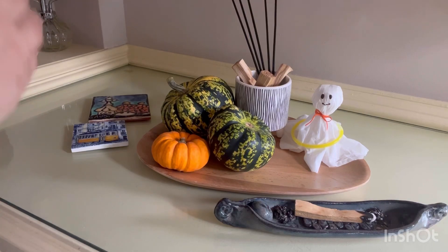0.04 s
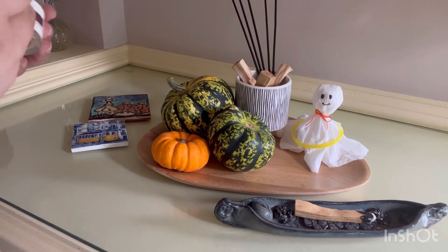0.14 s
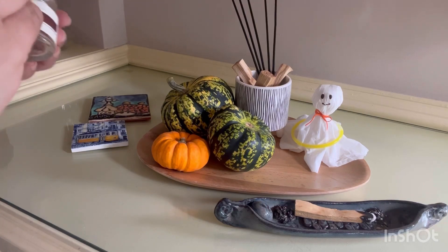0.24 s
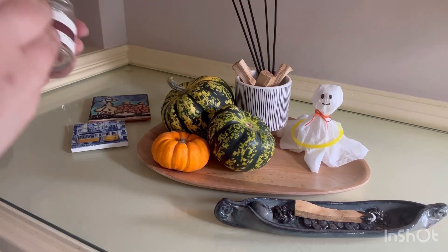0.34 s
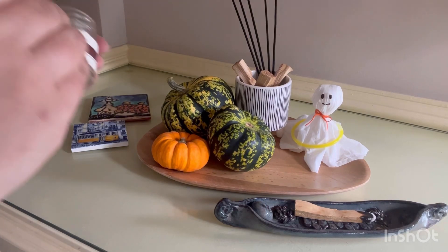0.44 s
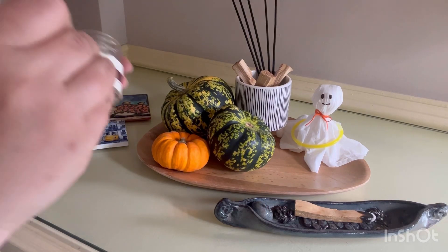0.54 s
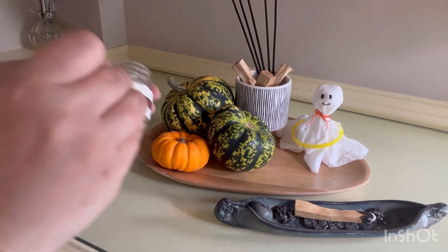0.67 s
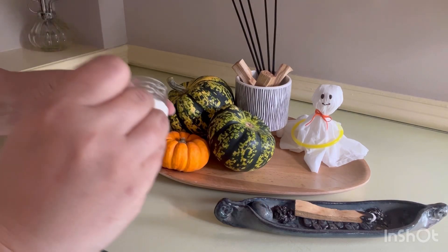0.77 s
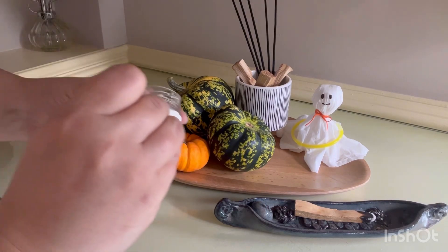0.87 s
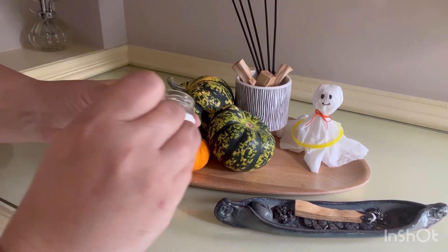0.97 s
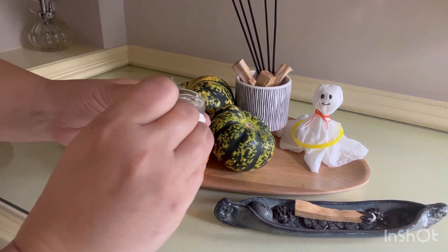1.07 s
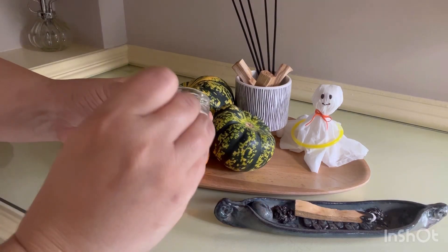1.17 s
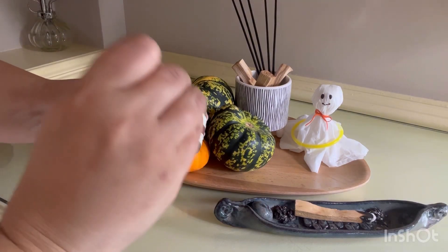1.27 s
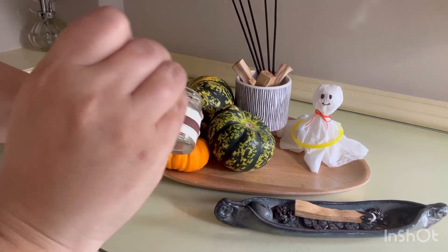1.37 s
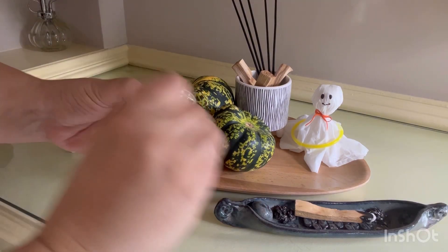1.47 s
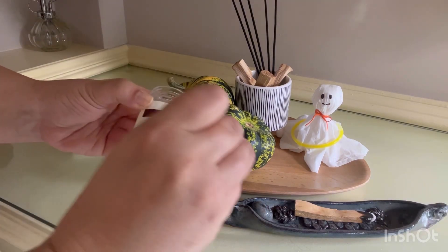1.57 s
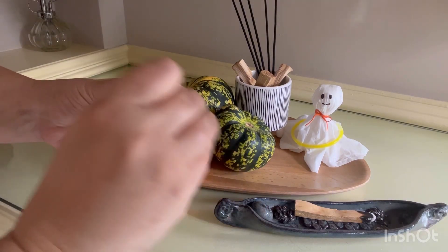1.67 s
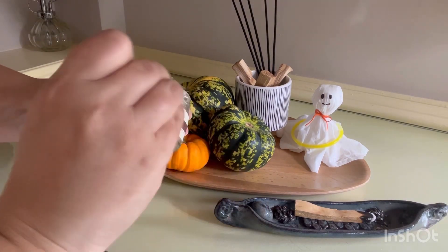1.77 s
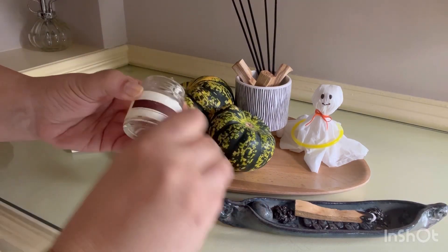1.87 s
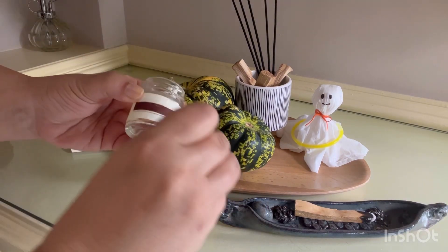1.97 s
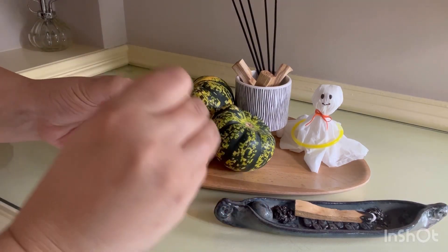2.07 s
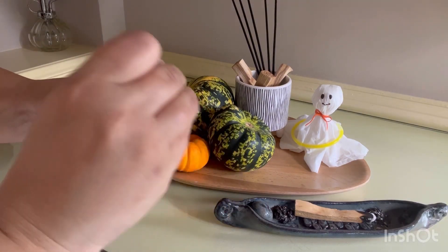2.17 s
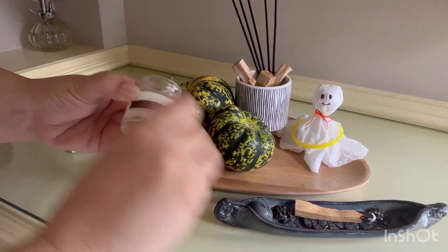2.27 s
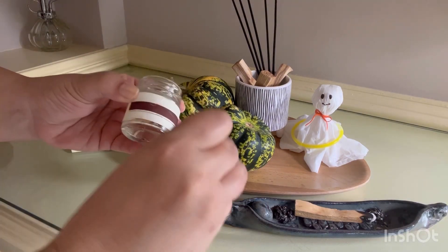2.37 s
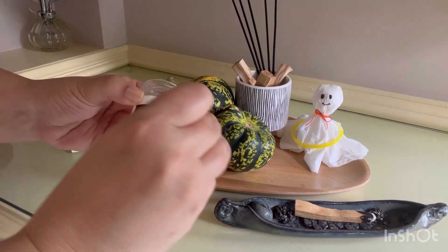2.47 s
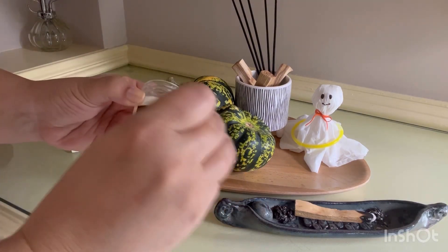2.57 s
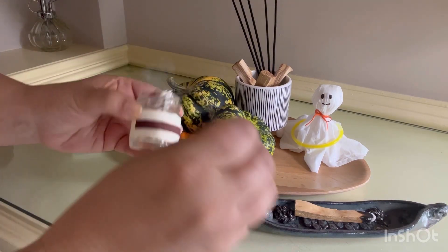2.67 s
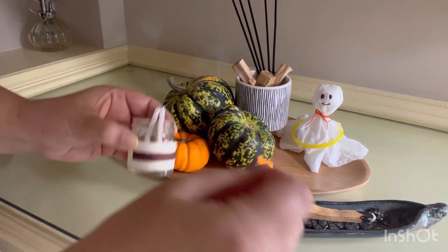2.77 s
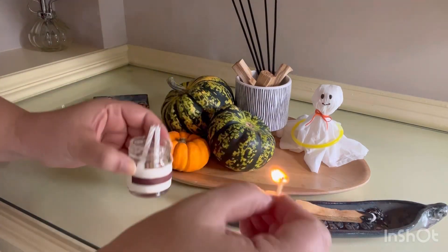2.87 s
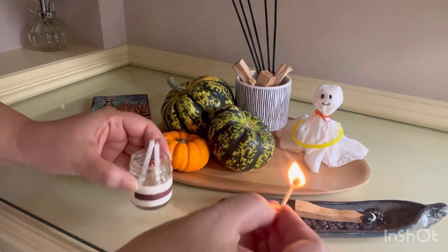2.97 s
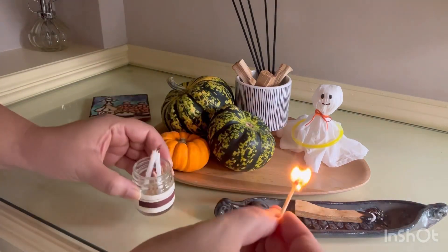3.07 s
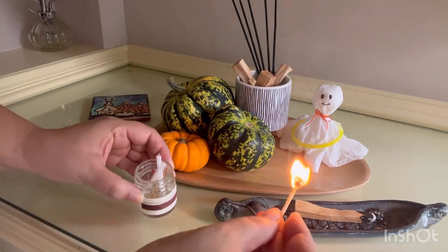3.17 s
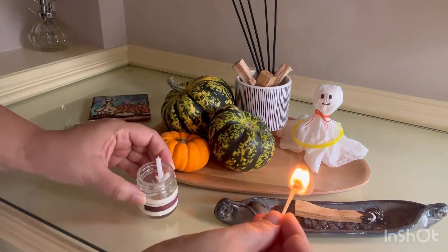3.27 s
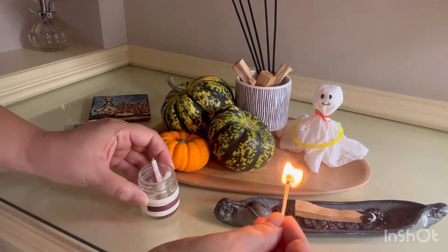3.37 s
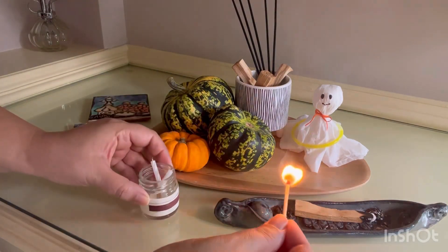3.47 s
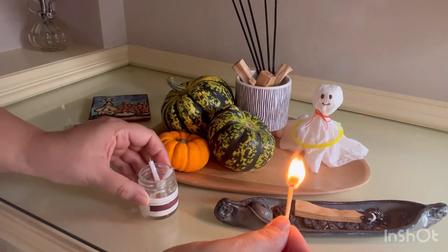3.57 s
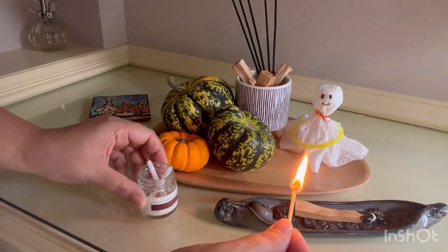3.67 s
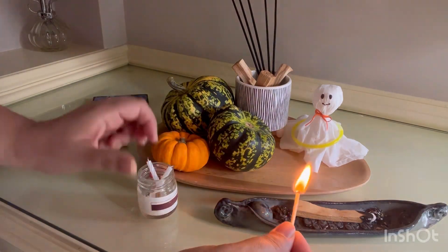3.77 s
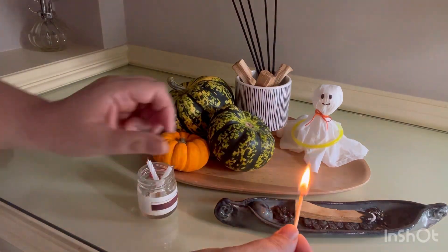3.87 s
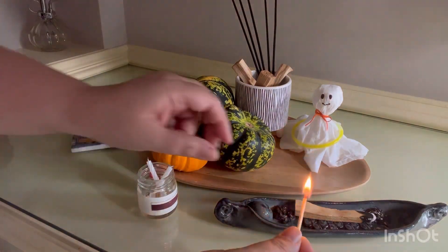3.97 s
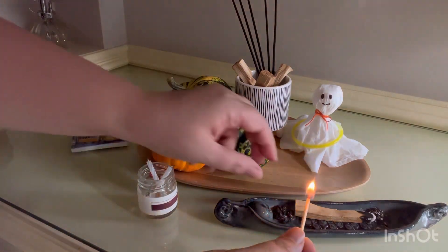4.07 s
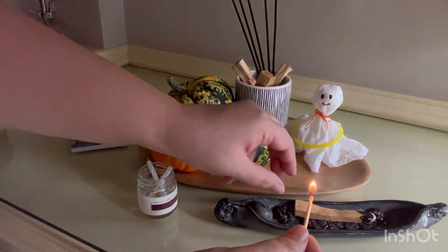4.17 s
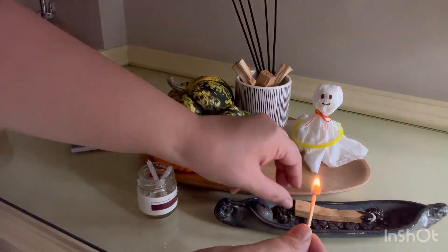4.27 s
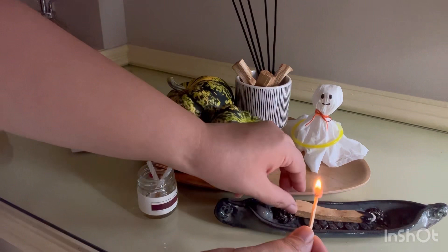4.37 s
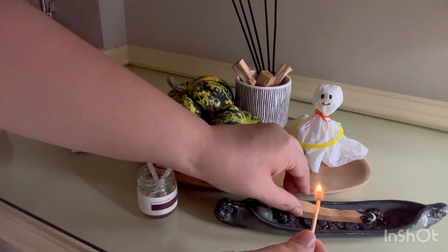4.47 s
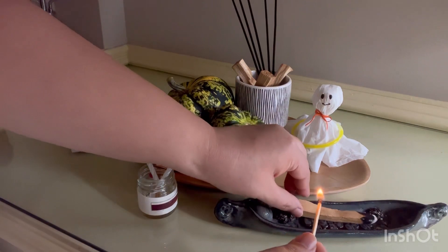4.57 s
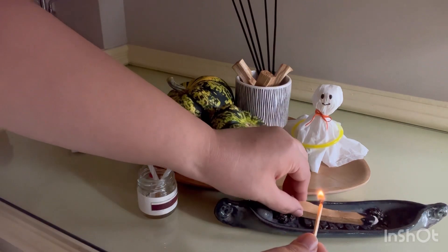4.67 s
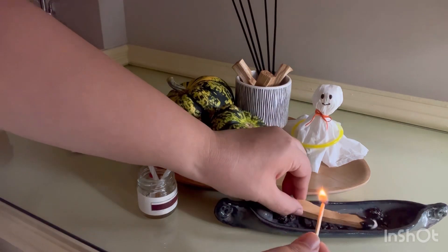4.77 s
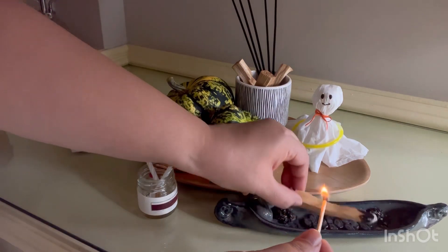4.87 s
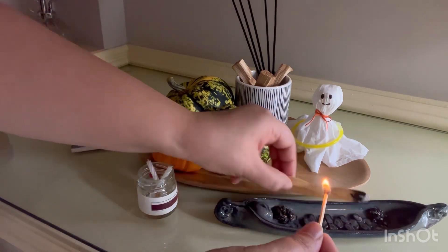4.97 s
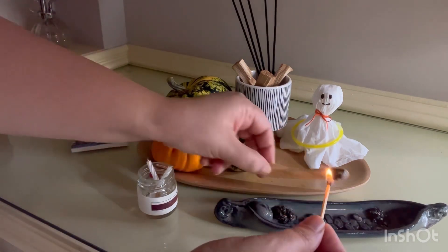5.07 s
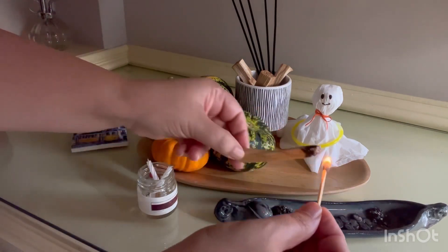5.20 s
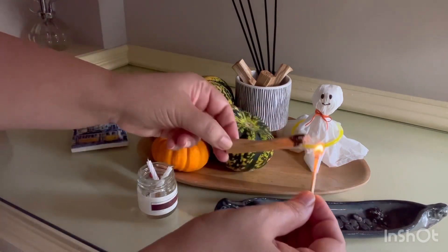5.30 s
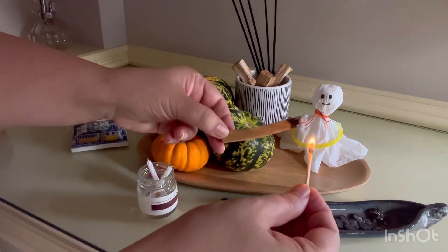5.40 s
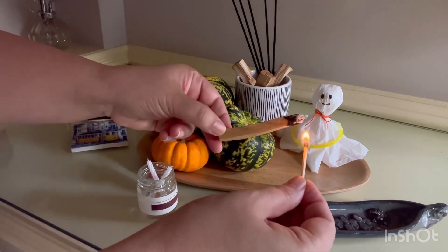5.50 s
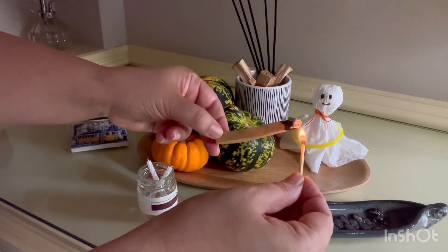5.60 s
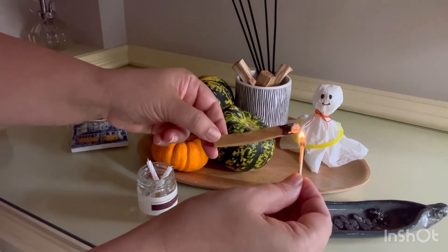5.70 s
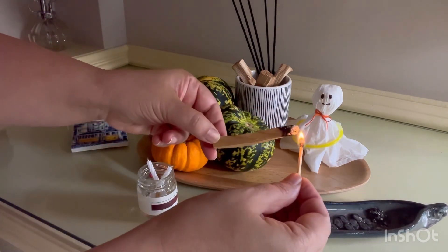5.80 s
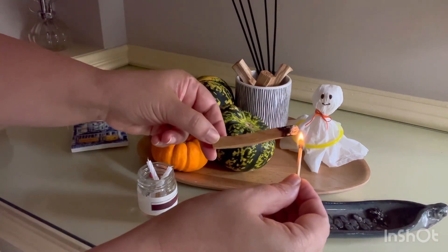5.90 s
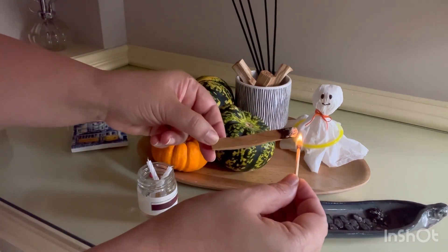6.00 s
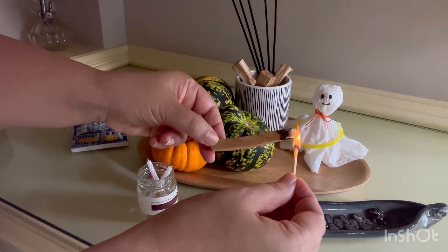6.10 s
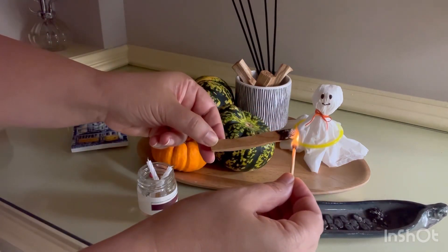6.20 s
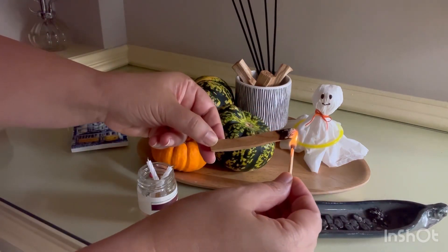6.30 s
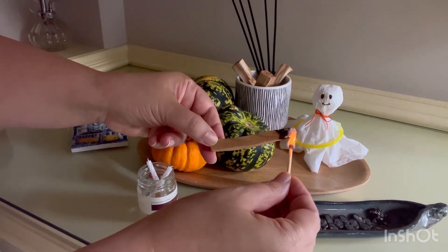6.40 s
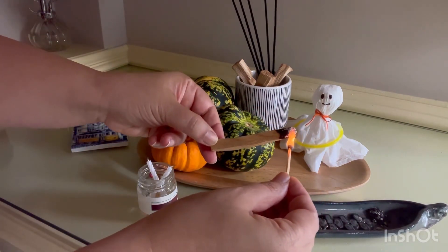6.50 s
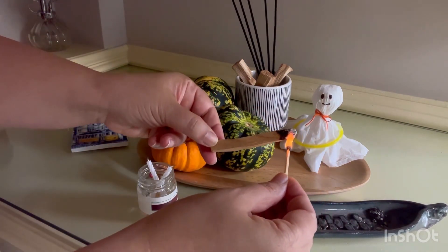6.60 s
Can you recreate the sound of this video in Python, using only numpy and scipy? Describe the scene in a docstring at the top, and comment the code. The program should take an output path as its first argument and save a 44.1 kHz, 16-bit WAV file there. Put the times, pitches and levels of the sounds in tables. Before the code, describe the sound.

Close stereo pickup at a table in a small quiet room with a low wavering hum and distant drone. Hands brush past, a match scrapes grittily against a glass jar three times, then ignites with a bright crackling hiss and sharp spits. The jar lands with hard clacks during the burn. After the head sputters out, a dry wooden stick ticks and scuffs lightly on its dish, fading to near silence.

```python
"""Quiet room, wavering hum, spells of a distant drone: hands swish past and a small glass jar squeaks and clinks.
A match is struck three times on the jar's base: noise bites and skidding grit, with a faint modal glass ring.
The third catches: filtered clicks and noise fizz over a low gas rush, with random spits and large pops.
The jar is knocked down on the table (modal ring plus noise crack) before the head sputters out.
A hand then picks a wooden incense stick out of its dish: noise ticks, scuffs, squeaks, a soft bump, last swishes."""
import sys
import numpy as np
from scipy import signal
from scipy.fft import rfft, irfft
from scipy.io import wavfile
from scipy.ndimage import uniform_filter1d, map_coordinates

SR = 44100
rng = np.random.default_rng(int(sys.argv[2]) if len(sys.argv) > 2 else 0)


def wav_out(sig):
    """Save sig, one row per channel (or a flat mono array), as 16-bit PCM at SR to the path in sys.argv[1]."""
    wavfile.write(sys.argv[1], SR, np.round(np.clip(np.atleast_2d(sig).T, -1, 1) * 32767).astype(np.int16))


N = 293166
TIME = np.arange(N) / SR

# Match head biting the striker: (time [s], level [dB], rise [s], fall [s], upper edge [Hz])
SCRAPES = [(1.4383, -34, 0.00037, 0.00073, 15900), (1.444, -59, 0.001, 0.0024, 7000),
           (1.4602, -46, 0.00041, 0.0013, 1640), (1.4645, -45.5, 0.00086, 0.0033, 15000),
           (1.4884, -53.5, 0.00077, 0.0027, 11000), (1.494, -42, 0.00057, 0.0013, 6500),
           (1.8168, -33.5, 0.0017, 0.0037, 16100), (1.825, -26, 0.0027, 0.0013, 11700),
           (2.242, -20.5, 0.0024, 0.0015, 14200)]
# Striker rasp spectrum: (frequency [Hz], level [dB])
STRIKER_SPECTRUM = [(200, -22.5), (600, -18.5), (1200, -12), (2200, -10.5), (3000, -13.5), (4200, -5),
                    (5700, -2), (8000, -3), (9000, -1), (11000, -2), (12500, -2.5), (14000, -1.5),
                    (16000, -2)]
# First stroke skidding over the grit without biting: (middle [s], half length [s], level [dB])
SKIDS = [(1.466, 0.0073, -49), (1.499, 0.033, -53.5)]
# Skid spectrum: (frequency [Hz], level [dB])
SKID_SPECTRUM = [(300, -11), (900, -8), (1500, 6), (2600, -8), (4000, -4), (5250, 2), (6300, -25),
                 (7400, 2), (7900, 16), (8400, 1.5), (9400, -5.5), (10400, -2), (12000, -3), (16000, -10.5)]
# Jar's ring: (frequency [Hz], level [dB], t60 [s])
GLASS_MODES = [(5480, -3, 0.035), (5874, 2.5, 0.014), (6640, -5.5, 0.03), (7300, -3.5, 0.084),
               (8880, 1.5, 0.045), (9810, 2, 0.04), (11000, 0.5, 0.04), (14600, 0, 0.038), (14730, -2, .04)]
# Glass ring under a light bite; a harder bite grips and damps it
GLASS_DB, GLASS_AT_DB, GRIP_DAMPING_DB_PER_DB = -6, -62.5, 0.2
CLINK_S, CLINK_DB = 0.257, -56  # jar touched as it is lifted

# Head catches, burns and is suddenly spent; the wood burns on far more quietly
CATCH_S, CATCH_RISE_S, SPENT_S, SPENT_FALL_S = 2.36, 0.094, 3.804, 0.0054
SMOULDER_DB = -10.5  # between the last stroke and the catch
WOOD_DB, WOOD_FADE_DB_PER_S = -11.5, 10.5
FIZZ_DB, RUSH_DB = -53.5, -55.5
GRAIN_SHARE = 0.6  # share of clicks in the fizz energy, rest noise
SPUTTER_DB, SPUTTER_GROWTH_DB_PER_S = -49, 7  # small beads, growing until the head is spent
# Fresh parts of the head igniting: (peak [s], half length [s], fizz boost [dB], gas boost [dB])
SURGES = [(2.433, .035, 6, 1.5), (2.529, 0.046, 3.5, 8), (2.767, 0.035, 13, 4.5), (3.235, 0.37, 9, 8),
          (3.74, 0.11, 4, 5.5)]
# Largest beads bursting: (time [s], level before pop_db [dB])
POPS = [(2.7272, -36), (2.95, -35.5), (3.0364, -35), (3.131, -30.5), (3.191, -32), (3.355, -32.5),
        (3.5764, -34), (3.6415, -29), (3.7824, -30.5), (3.7964, -31.5), (3.824, -40.5)]
# Fizz spectrum: (frequency [Hz], level [dB])
FIZZ_SPECTRUM = [(500, -14.5), (850, -1.5), (1050, -7), (1350, -2), (2000, -3.5), (2750, -7.5),
                 (3200, -7.5), (4100, -6.5), (6300, -4), (8300, -6), (11600, -7.5), (13000, -14.5),
                 (16000, -14.5)]
# Gas rush spectrum: (frequency [Hz], level [dB])
RUSH_SPECTRUM = [(40, -15), (70, -1), (100, -7), (135, 3), (180, -7.5), (330, -3.5), (520, -4.5),
                 (640, -8.5), (830, -12.5), (1100, -14), (2500, -19), (5000, -46)]
# Hollow of the hand cupping the young flame: (frequency [Hz], level [dB])
HOLLOW_SPECTRUM = [(150, -8), (340, 7.5), (600, -7), (850, 6.5), (1200, -12.5), (1700, -2), (2300, -12),
                   (3100, 6), (3600, -8.5), (4150, 1), (5000, -14), (16000, -37)]
CUPPED_S, CUPPED_HALF_S, CUPPED_DB = 2.49, 0.09, -53
# Hands, jar and table reflecting the flame's sound: (extra path [ms], level [dB])
MIRRORS = [(0.52, -15), (2.4, -7), (3.3, -14.5)]

# Jar meeting the table: (time [s], level [dB], upper edge before any scaling [Hz], chatter [s])
KNOCKS = [(3.3808, -27.5, 2400, 0.0022), (3.3832, -15, 4300, 0.0085), (3.4992, -33, 1900, 0.017),
          (3.523, -38, 1500, 0.01), (3.6782, -23.5, 2300, 0.0089)]
# Jar and table top together: (frequency [Hz], level [dB], t60 [s])
JAR_ON_TABLE_MODES = [(640, -6, 0.05), (690, -5, 0.1), (981, -7.5, 0.069), (1155, -5, 0.017),
                      (1294, -2, 0.04), (1375, -1.5, 0.035), (1486, -4, 0.075), (1736, -1.5, 0.0303),
                      (1916, -9, 0.06), (2090, -0.5, .03), (2110, 0.5, 0.05), (2420, -9, 0.03),
                      (2610, -3.5, .04), (2832, -1.5, 0.017), (3400, -6, .05), (3600, -3, 0.04),
                      (3705, -2, 0.04), (3935, 3.5, 0.11), (4030, -1.5, 0.03), (5000, 3.5, 0.02)]
# Landing crack spectrum: (frequency [Hz], level [dB])
CRACK_SPECTRUM = [(150, -12.5), (480, -10.5), (680, -5.5), (950, -5.5), (1400, 1), (1800, -2), (2300, 2),
                  (2850, 0), (3300, -2), (4000, -0.5), (5100, -5), (5800, -11), (9000, -17), (15000, -25.5)]

# Stick knocking on dish and between fingers: (time [s], level [dB], fall [s], upper edge [Hz])
TAPS = [(4.2574, -46.5, 0.0017, 2370), (4.28, -48, 0.0012, 3580), (4.309, -45.5, 0.0023, 3380),
        (4.3516, -37, 0.00075, 9900), (4.358, -43, 0.0046, 5200), (4.3885, -40, 0.00078, 2490),
        (4.616, -50.5, 0.0037, 9300), (4.726, -59.5, 0.00071, 2800), (4.7457, -56, 0.002, 1300),
        (4.8101, -47, 0.0022, 1150), (4.822, -56.5, 0.0013, 2800), (4.9497, -38, 0.001, 10000),
        (5.295, -36.5, 0.0011, 8500)]
# Stick dragged over dish or fingers: (middle [s], half length [s], level [dB], upper edge [Hz])
SCUFFS = [(4.263, 0.023, -58, 7000), (4.314, 0.019, -55.5, 9600), (4.377, 0.0035, -51, 4400),
          (4.55, 0.019, -71.5, 3500), (4.616, 0.012, -61, 8900), (4.762, 0.052, -62.5, 990),
          (5.317, 0.018, -72, 7120)]
# Dry wood spectrum: (frequency [Hz], level [dB])
STICK_SPECTRUM = [(100, -0.5), (400, 0.5), (800, -1), (1500, -6.5), (2100, -3), (2900, -5.5), (3700, -3),
                  (6000, -2), (8500, -2.5), (10500, -0.5), (12500, 3), (15000, -4)]
# Dish's ring: (frequency [Hz], level [dB], t60 [s])
DISH_MODES = [(834, -1.5, 0.061), (1401, -1.5, 0.08), (2045, 2.5, 0.043), (3480, -18, 0.079)]
# Finger on glass, stick on dish: (middle [s], half length [s], level [dB], mean pitch [Hz])
SQUEAKS = [(0.253, 0.0079, -60.5, 1380), (4.553, .007, -73, 3480), (4.796, 0.0053, -71, 3490)]

# Hands bumping the furniture: (time [s], level [dB], contact time [s])
BUMPS = [(1.836, -39, 0.0084), (4.363, -42, 0.0011), (4.372, -46.5, 0.0037), (4.389, -34, 0.0054),
         (4.405, -42.5, 0.0081), (4.626, -45, 0.0047), (4.811, -60, 0.0015)]
# Cabinet modes: (frequency [Hz], level [dB], t60 [s])
CABINET_MODES = [(64.1, -5, 0.28), (137, -5, 0.26), (224, -5.5, 0.31), (264, -2, 0.2), (320, 1, 0.072),
                 (394, -1, 0.05)]
# Hands gliding past: (middle [s], half length [s], level [dB], brightest band [Hz], width [octaves])
SWISHES = [(0.008, 0.035, -67, 6700, 2.2), (0.153, 0.28, -66.5, 2200, 0.48), (0.36, 0.12, -63, 2300, 0.45),
           (0.663, 0.21, -62.5, 7700, 1.6), (1.017, 0.23, -64.5, 5800, 3.6),
           (4.038, 0.16, -62.5, 2502, 2.1), (5.178, 0.14, -68, 3130, 3.5),
           (5.412, 0.086, -72.5, 1297, 0.76), (6.42, 0.04, -76, 1000, 1.1)]
# Skin rubbing spectrum: (frequency [Hz], level [dB])
SKIN_SPECTRUM = [(200, -5), (900, 1), (1500, 4), (3000, 1), (5000, 0), (7500, 1), (10500, -0.5),
                 (12500, -7), (15000, -13.5)]
SWISH_PEAK_DB = 12
HANDLING_DB = -86  # faint rubbing of the fingers throughout
# Hand and forearm dragging over the table: (middle [s], half length [s], level [dB])
RUSTLES = [(2.31, .05, -58.5), (3.831, 0.011, -52.5), (4.759, .02, -61), (4.832, 0.035, -62),
           (4.974, 0.14, -69), (5.183, 0.056, -70.5), (5.437, 0.055, -67.5)]
# Forearm rustle spectrum: (frequency [Hz], level [dB])
FOREARM_SPECTRUM = [(40, -7), (140, 1.5), (300, 0), (500, -7.5), (750, -5.5), (1300, -19.5), (2500, -31),
                    (8000, -51.5)]

# Still room air spectrum: (frequency [Hz], level [dB])
AIR_SPECTRUM = [(25, -16), (50, -0.5), (75, 4), (105, -8), (140, -5.5), (230, -9.5), (400, -18.5),
                (750, -16.5), (1070, -18), (1300, -27), (3200, -38.5), (6000, -38.5), (10300, -34.5),
                (13000, -42), (16000, -50)]
AIR_DB = -64.5
HUM_HZ, HUM_DB = 65, -66  # centres of the wavering pitch and level
# Spells of a distant drone: (start [s], end [s], level [dB])
DRONES = [(0.09, 0.494, -57), (0.597, 2.065, -59)]
# Drone spectrum: (frequency [Hz], level [dB])
DRONE_SPECTRUM = [(30, 0.5), (80, -3.5), (170, -10), (220, -3), (280, -0.5), (330, 5.5), (400, -7),
                  (520, -8), (700, -11.5), (1000, -13.5), (1400, -20), (3000, -34), (8000, -60.5)]
DRONE_RISE_S, DRONE_FALL_S = 0.062, 0.094
MURK_DB, MURK_FADE_DB_PER_S = -63, 4.5  # drone left outside its spells

# Likeness of the ports in diffuse noise: (frequency [Hz], left-right correlation [-])
PORT_CORRELATION = [(60, 0.78), (140, 0.92), (300, 0.26), (700, 0), (2000, 0), (16000, 0.057)]
# Room decay: (frequency [Hz], t60 [s])
ROOM_T60 = [(100, 0.41), (500, 0.26), (1500, 0.3), (4000, 0.27), (9000, 0.28), (16000, 0.13)]
# Colour of the left port against the right: (frequency [Hz], level [dB])
PORT_COLOUR = [(60, 1), (300, 3), (680, -1), (1300, -1), (2400, -2.5), (4400, 1.5), (6500, 2), (8500, -3)]
# Above the join both channels carry one signal, the left a little later
JOIN_HZ, JOIN_WIDTH_HZ, JOIN_LAG_S, JOIN_IN_PHASE_HZ = 7530, 440, 0.00024, 10354
EDGE_HZ = 16300  # band limit


def strikes(clink_rise_s=0.0041, catch_db=3):
    """The head tears over the grit in short bites or skids roughly, faintly exciting the jar's modes."""
    out, t = np.zeros(N), np.arange(SR // 4) / SR
    for s, db, rise_s, fall_s, edge_hz in SCRAPES:
        bite = np.minimum(t / rise_s, 1) * np.exp(-np.maximum(t - rise_s, 0) / fall_s)
        rasp = colour(burst(bite), STRIKER_SPECTRUM, edge_hz)
        glass = signal.fftconvolve(rasp, ring(GLASS_MODES, t))[:len(t)]
        glass_db = GLASS_DB - GRIP_DAMPING_DB_PER_DB * max(db - GLASS_AT_DB, 0)
        add(out, s, amp(db) * (rasp + amp(glass_db) * unit(glass) * rasp.std()))
    friction = unit(grit(per_s=5000, spread_db=2.0) * amp(catch_db * wander(rate_hz=280)))
    skid_level = sum(amp(db) * swell(s, half_s) for s, half_s, db in SKIDS)
    out += colour(friction * skid_level, SKID_SPECTRUM)
    clink = np.minimum(t / clink_rise_s, 1) * ring(GLASS_MODES, t, edge_hz=8000)
    add(out, CLINK_S, amp(CLINK_DB) * clink)
    pair = place(out, lag_ms=0.2965, pan_db=4.0, bounce_ms=(1.3, 1.02), bounce=0.051)
    return room(pair, near_db=0.5, tail_db=-5.5)


def flare(flicker_db=1.0, flutter_db=1.0, pop_s=0.00031, pop_db=2):
    """Gas rushes from the burning head, which fizzes, spits sharply and bursts a few large beads."""
    head, wood = burn()
    fizz_surge = amp(sum(db * swell(s, half_s) for s, half_s, db, _ in SURGES))
    rush_surge = amp(sum(db * swell(s, half_s) for s, half_s, _, db in SURGES))
    grains = np.sqrt(GRAIN_SHARE) * grit(per_s=2600, spread_db=5.5)
    sparks = grains + np.sqrt(1 - GRAIN_SHARE) * rng.standard_normal(N)
    flicker = amp(flicker_db * wander(rate_hz=170))
    fizz = sparks * (head * fizz_surge + wood) * flicker * amp(FIZZ_DB)
    sputter_db = SPUTTER_DB + SPUTTER_GROWTH_DB_PER_S * np.minimum(TIME - SPENT_S, 0)
    fizz += spits(per_s=90, spread_db=3, fall_s=0.0005) * head * amp(sputter_db)
    t = np.arange(SR // 100) / SR
    for s, db in POPS:
        add(fizz, s, amp(db + pop_db) * burst(np.exp(-t / pop_s)))
    cupped = rng.standard_normal(N) * head * swell(CUPPED_S, CUPPED_HALF_S)
    fizz = colour(fizz, FIZZ_SPECTRUM) + amp(CUPPED_DB) * colour(cupped, HOLLOW_SPECTRUM)
    ports = fizz, amp(-5.0) * delayed(fizz, 0.00006)
    fizz = np.array([mirrored(port, sway_ms=0.08) for port in ports])
    flutter = amp(RUSH_DB + flutter_db * wander(rate_hz=12.0))
    rush = diffuse(RUSH_SPECTRUM, pan_db=1.0) * (head * rush_surge + wood) * flicker * flutter
    flame = room(fizz, near_db=-10.5, tail_db=-16.0) + rush
    return mottled(flame, patch_db=0.5, patch_hz=500, patch_s=0.04)


def burn():
    """Flame strength: the head smoulders, catches and is spent, then the wood burns on."""
    struck_s = SCRAPES[-1][0]
    smoulder = amp(SMOULDER_DB) * held(struck_s, CATCH_S, rise_s=0.01, fall_s=0.016)
    head = held(CATCH_S, SPENT_S, CATCH_RISE_S, SPENT_FALL_S)
    wood = amp(WOOD_DB - WOOD_FADE_DB_PER_S * (TIME - SPENT_S)) * (TIME > SPENT_S)
    return smoulder + head, wood


def spits(per_s, spread_db, fall_s):
    """Beads burst at uneven intervals, each a very short decaying puff of noise."""
    count = round(2 * per_s * N / SR)
    gaps, sizes = rng.exponential(1, (count, 2)).T
    at = (np.cumsum(0.3 + 0.7 * gaps) / per_s * SR).astype(int)
    kicks = np.bincount(at, amp(spread_db * np.minimum(sizes, 2)), minlength=N)[:N]
    puffs = signal.lfilter([1], [1, -np.exp(-1 / (fall_s * SR))], kicks)
    return unit(puffs * rng.standard_normal(N))


def mirrored(x, sway_ms):
    """Close reflections comb the sound, and the comb shifts as the hand moves."""
    out = x
    for ms, db in MIRRORS:
        path_s = (ms + sway_ms * wander(rate_hz=2.5)) / 1000
        out = out + amp(db) * map_coordinates(x, [(TIME - path_s) * SR], order=3)
    return out * np.linalg.norm(x) / np.linalg.norm(out)


def mottled(x, patch_db, patch_hz, patch_s):
    """The colour shifts from moment to moment in random time-frequency patches."""
    z = signal.stft(x, SR, nperseg=512, noverlap=384)[2]
    bins = max(round(patch_hz * 512 / SR), 1)
    frames = max(round(patch_s * SR / 128), 1)
    patches = uniform_filter1d(rng.standard_normal(z.shape[1:]), bins, axis=0)
    patches = uniform_filter1d(patches, frames, axis=1)
    z = z * amp(patch_db * unit(patches))
    out = signal.istft(z, SR, nperseg=512, noverlap=384)[1][:, :N]
    return unit(out) * x.std()


def jar(ring_db=-0.7, crack_db=0.8, rise_s=0.0021, right_db=-3.0, shared=0.25):
    """The jar lands, rocks and settles: each dry, chattering clack briefly rings glass and table top."""
    out, t = np.zeros((2, N)), np.arange(SR // 4) / SR
    for s, db, edge_hz, chatter_s in KNOCKS:
        for side in out:
            crack = colour(burst(swell(0, chatter_s, t)), CRACK_SPECTRUM, 1.39 * edge_hz)
            body = ring(JAR_ON_TABLE_MODES, t, edge_hz)
            onset = 1 - np.exp(-t / rise_s)
            add(side, s, amp(db) * onset * (amp(ring_db) * body + amp(crack_db) * crack))
    out = (out + shared * out[::-1]) / np.hypot(1, shared)
    return room(out * amp([[0], [right_db]]), near_db=-10.5, tail_db=-7.5)


def stick(dish_db=-11, catch_db=4):
    """Dry wood scuffs and ticks on the dish and between the fingers, faintly exciting the dish's modes."""
    out, t = np.zeros(N), np.arange(SR // 4) / SR
    for s, db, fall_s, edge_hz in TAPS:
        add(out, s, amp(db) * colour(burst(np.exp(-t / fall_s)), STICK_SPECTRUM, edge_hz))
    friction = unit(grit(per_s=2500, spread_db=6.5) * amp(catch_db * wander(rate_hz=200)))
    for s, half_s, db, edge_hz in SCUFFS:
        out += amp(db) * colour(friction * swell(s, half_s), STICK_SPECTRUM, edge_hz)
    dish = signal.fftconvolve(out, ring(DISH_MODES, t))[:N]
    out += amp(dish_db) * out.std() * unit(dish)
    pair = place(out, lag_ms=-0.012, pan_db=3.5, bounce_ms=(0.55, 0.6), bounce=0.13)
    return room(pair, near_db=-2.5, tail_db=-6.5)


def squeaks(jitter=0.012):
    """Smooth surfaces stick and slip for a moment: a sine of unsteady pitch."""
    out = np.zeros(N)
    for s, half_s, db, hz in SQUEAKS:
        turns = np.cumsum(hz * (1 + jitter * wander(rate_hz=400))) / SR
        out += amp(db) * swell(s, half_s) * np.sin(2 * np.pi * turns)
    return room(np.array([out, out]), near_db=-8, tail_db=-9)


def bumps():
    """A soft push rings the cabinet modes; the longer the contact, the deeper the thud."""
    out, t = np.zeros(N), np.arange(SR // 2) / SR
    body = np.zeros(len(t))
    for hz, db, t60_s in CABINET_MODES:
        body += amp(db) * np.sin(2 * np.pi * hz * t) * np.exp(-np.log(1000) * t / t60_s)
    for s, db, contact_s in BUMPS:
        push = np.sin(np.pi * np.minimum(t / contact_s, 1))
        add(out, s, amp(db) * signal.fftconvolve(body, push / push.sum()))
    return room(out * amp([[0], [-2]]), near_db=-16, tail_db=-13.5)


def hands(wobble_db=1.0):
    """Each move of a hand is a soft noise swish with a bright band of its own."""
    octave = np.log2(np.fft.rfftfreq(N, 1 / SR) + 1)
    rub = diffuse(SKIN_SPECTRUM, pan_db=5.5)
    out, skin = amp(HANDLING_DB) * rub, rfft(rub)
    for s, half_s, db, hz, width_octaves in SWISHES:
        bright = amp(SWISH_PEAK_DB * swell(np.log2(hz), width_octaves, octave))
        swish = np.roll(irfft(skin * bright, N), rng.integers(N), axis=1)  # fresh stretch of noise
        out = out + amp(db) * swell(s, half_s) * unit(swish)
    return out * amp(wobble_db * wander(rate_hz=16))


def forearm():
    """Skin drags over the table: a dull, soft noise rustle."""
    level = sum(amp(db) * swell(s, half_s) for s, half_s, db in RUSTLES)
    return diffuse(FOREARM_SPECTRUM, pan_db=2.0) * level


def background(waver_db=2, drift=0.1, drone_waver_db=1.43, air_waver_db=1.5):
    """Room air and the distant drone are diffuse noise; the low hum is a sine wavering in pitch and level."""
    air = amp(AIR_DB + air_waver_db * wander(rate_hz=7.7)) * diffuse(AIR_SPECTRUM, pan_db=1.5)
    hum_level = amp(HUM_DB + waver_db * wander(rate_hz=8.7))
    turns = np.cumsum(HUM_HZ * (1 + drift * wander(rate_hz=6.1))) / SR
    hum = hum_level * np.sin(2 * np.pi * turns)
    spells = sum(amp(db) * held(start_s, end_s, DRONE_RISE_S, DRONE_FALL_S) for start_s, end_s, db in DRONES)
    level = np.maximum(spells, amp(MURK_DB - MURK_FADE_DB_PER_S * TIME))
    drone = diffuse(DRONE_SPECTRUM, pan_db=3) * level * amp(drone_waver_db * wander(rate_hz=4.4))
    return air + hum * amp([[1.5], [-1.5]]) + drone


def amp(db):
    """Decibels to amplitude."""
    return 10 ** (np.asarray(db) / 20)


def unit(x):
    """Scale to unit RMS."""
    return x / np.sqrt(np.mean(x ** 2) + 1e-20)


def read(points, hz):
    """Table values joined by straight lines over log frequency."""
    f, value = np.transpose(points)
    return np.interp(np.log(hz + 1), np.log(f + 1), value)


def add(mix, s, sound):
    """Mix a sound in at s seconds, cut at the end."""
    part = mix[..., round(s * SR):][..., :sound.shape[-1]]
    part += sound[..., :part.shape[-1]]


def swell(middle, half, t=TIME):
    """Gaussian rise and fall around a middle."""
    return np.exp(-((t - middle) / half) ** 2)


def held(start_s, end_s, rise_s, fall_s):
    """Linear attack, hold and exponential release."""
    return np.clip((TIME - start_s) / rise_s, 0, 1) * np.exp(-np.maximum(TIME - end_s, 0) / fall_s)


def wander(rate_hz):
    """Slow noise of unit RMS with a Gaussian low-pass at rate_hz."""
    hz = np.fft.rfftfreq(N, 1 / SR)
    return unit(irfft(rfft(rng.standard_normal(N)) * np.exp(-(hz / rate_hz) ** 2), N))


def grit(per_s, spread_db):
    """Tiny random clicks, a few much larger than the rest."""
    sizes = amp(spread_db * np.minimum(rng.exponential(1, N), 4))
    return unit(sizes * rng.choice([-1, 1], N) * (rng.random(N) < per_s / SR))


def burst(envelope):
    """A crowd of micro-impacts under an envelope, holding just the envelope's energy."""
    x = rng.standard_normal(len(envelope)) * envelope
    for _ in range(3):  # even out the spectrum: every impact is sharp
        flat = irfft(np.exp(1j * np.angle(rfft(x))), len(x))
        x = flat * (envelope / envelope.max()) ** 0.5
    return x * np.linalg.norm(envelope) / np.linalg.norm(x)


def ring(modes, t, edge_hz=SR):
    """Decaying modes at random phases; a soft contact leaves those above edge_hz quiet."""
    hz, db, t60_s = np.transpose(modes)[..., None]
    weight = amp(db) / np.sqrt(1 + (hz / edge_hz) ** 6)
    waves = np.sin(2 * np.pi * (hz * t + rng.random(hz.shape)))
    waves = waves * np.exp(-np.log(1000) * t / t60_s)
    return (weight * waves).sum(0) / np.linalg.norm(weight)


def colour(x, points, edge_hz=SR, size=4096):
    """Minimum-phase filter of unit energy with the given spectrum, falling away above edge_hz."""
    hz = abs(np.fft.fftfreq(size, 1 / SR))
    gain = amp(np.maximum(read(points, hz), -100)) / np.sqrt(1 + (hz / edge_hz) ** 6)
    taps = np.fft.ifft(np.exp(np.conj(signal.hilbert(np.log(gain))))).real
    taps = np.array(taps / np.linalg.norm(taps), ndmin=x.ndim)
    return signal.fftconvolve(x, taps, axes=-1)[..., :x.shape[-1]]


def delayed(x, s):
    """Delay by a fraction of a sample or more, as a phase slope."""
    return irfft(rfft(x) * np.exp(-2j * np.pi * np.fft.rfftfreq(N, 1 / SR) * s), N)


def place(x, lag_ms, pan_db, bounce_ms, bounce):
    """Two microphone ports hear the source and its bounce off the table top; the left lags by lag_ms."""
    left = delayed(x, lag_ms / 1000) + bounce * delayed(x, bounce_ms[0] / 1000)
    right = x + bounce * delayed(x, bounce_ms[1] / 1000)
    return np.array([left * amp(pan_db / 2), right * amp(-pan_db / 2)]) / np.hypot(1, bounce)


def diffuse(points, pan_db):
    """Noise from all around, correlated between the ports as tabled."""
    a, b = rfft(rng.standard_normal((2, N)))
    hz = np.fft.rfftfreq(N, 1 / SR)
    same = np.clip(read(PORT_CORRELATION, hz), -1, 1)
    spectra = np.array([a, same * a + np.sqrt(1 - same ** 2) * b])
    pair = irfft(spectra * amp(read(points, hz)), N)
    return unit(pair) * amp([[pan_db / 2], [-pan_db / 2]])


def room(x, near_db, tail_db, near_s=0.0037):
    """Quick scatter from the corner and the ornaments, then the tail of the room."""
    t = np.arange(SR // 2) / SR
    taps = rng.choice([-1., 1.], (2, len(t))) * (rng.random((2, len(t))) < 5000 / SR)
    near = taps * np.exp(-t / near_s) * (t > 0.0015)
    hz, at_s, z = signal.stft(taps * (t > 0.007), SR, nperseg=256)
    decay = np.exp(-np.log(1000) * at_s / read(ROOM_T60, hz)[:, None])
    tail = signal.istft(z * decay, SR, nperseg=256)[1][:, :len(t)]
    echo = (amp(near_db) * unit(near) + amp(tail_db) * unit(tail)) / np.sqrt(len(t))
    return x + signal.fftconvolve(x, echo, axes=1)[:, :N]


def scene():
    """Sum of all sources at the two ports."""
    return strikes() + flare() + jar() + stick() + squeaks() + bumps() + hands() + forearm() + background()


def record(dry):
    """Ports coloured apart and joined in the treble, then the low cut and the band limit."""
    hz = np.fft.rfftfreq(N, 1 / SR)
    left, right = rfft(dry) * amp(np.outer([0.5, -0.5], read(PORT_COLOUR, hz)))
    joined = 0.5 + 0.5 * np.tanh((hz - JOIN_HZ) / (2 * JOIN_WIDTH_HZ))
    early = left * np.exp(2j * np.pi * (hz - JOIN_IN_PHASE_HZ) * JOIN_LAG_S)
    heard = irfft(np.array([left, np.sqrt(1 - joined ** 2) * right + joined * early]), N)
    heard = signal.sosfilt(signal.butter(2, 30, "highpass", fs=SR, output="sos"), heard)
    band = signal.firwin(255, EDGE_HZ, window=("kaiser", 9), fs=SR)
    return signal.oaconvolve(heard, band[None], "same")


dry = scene()
out = record(dry)
wav_out(out)
```